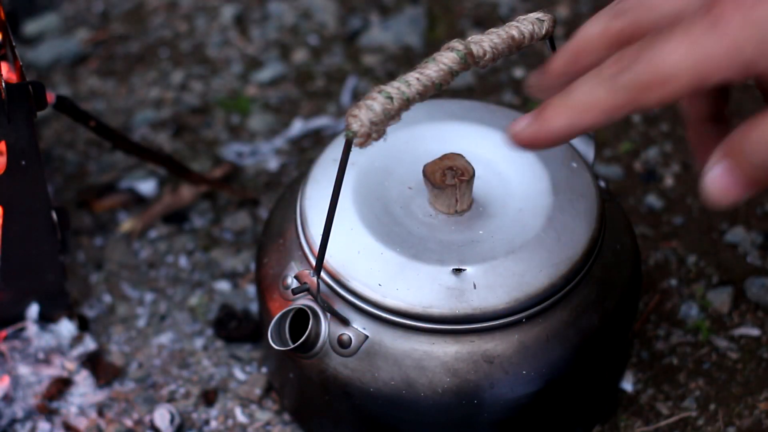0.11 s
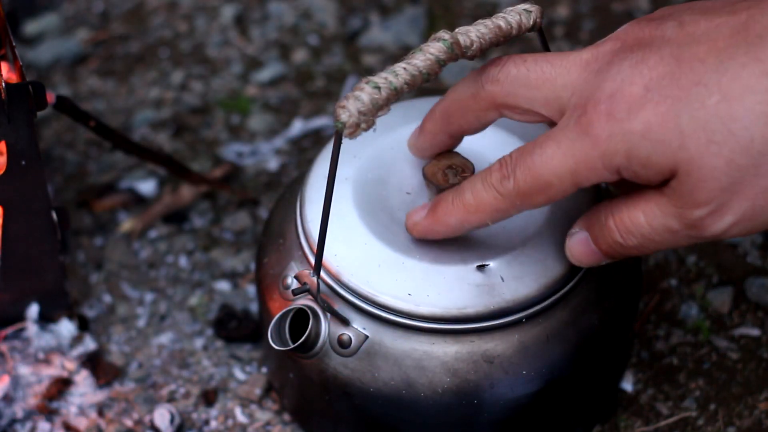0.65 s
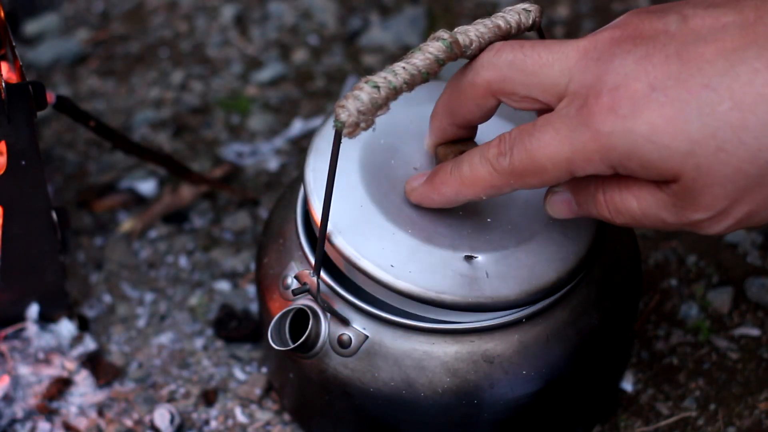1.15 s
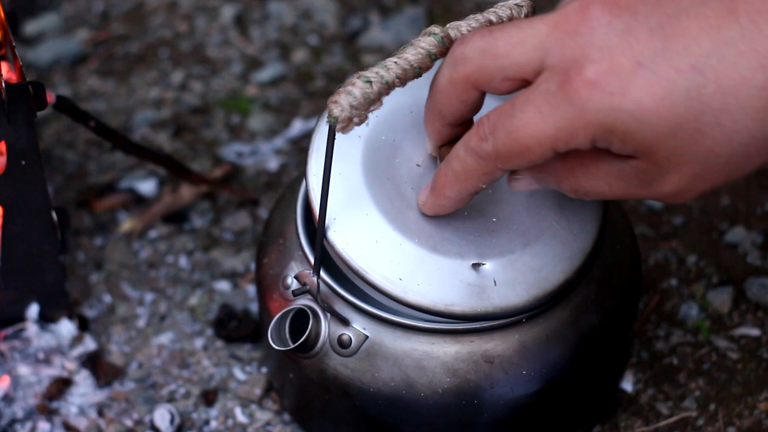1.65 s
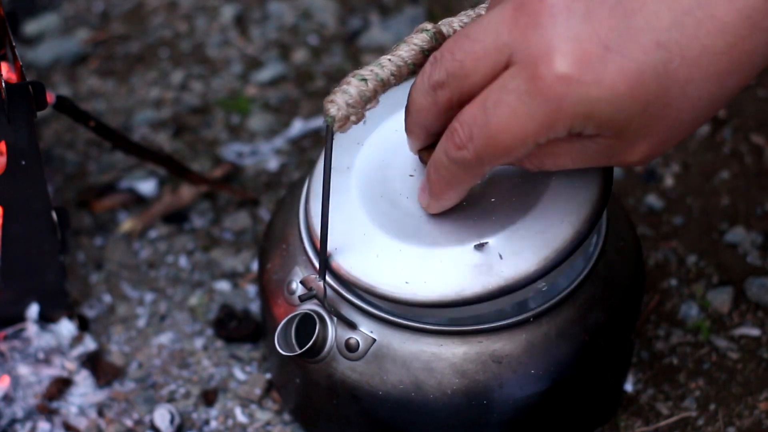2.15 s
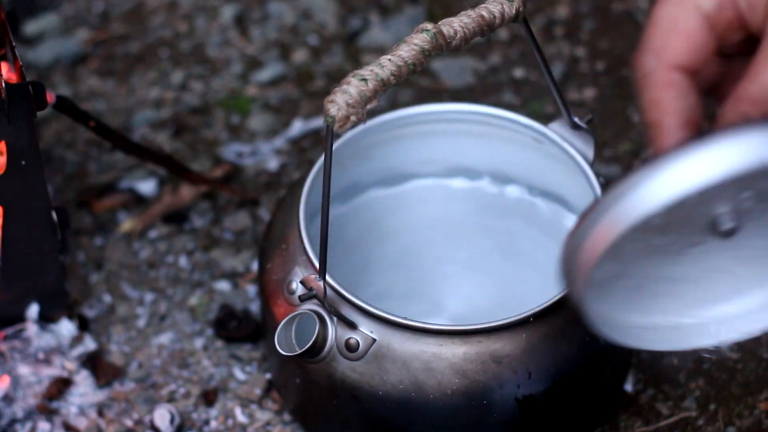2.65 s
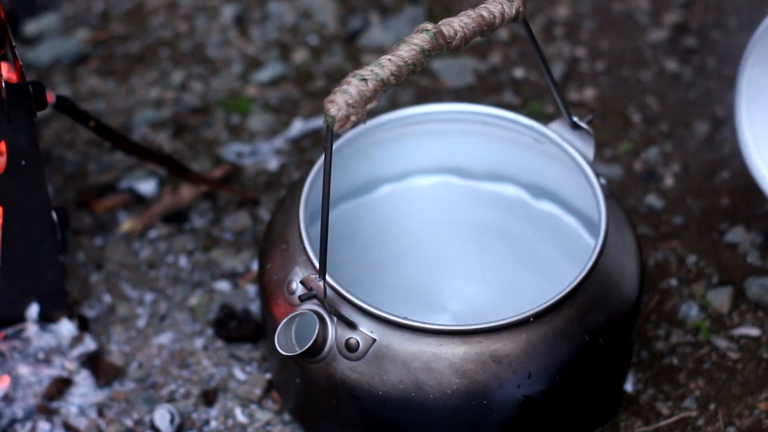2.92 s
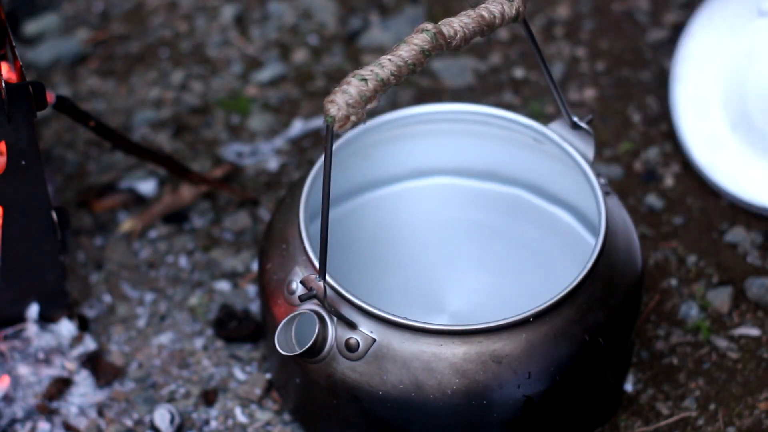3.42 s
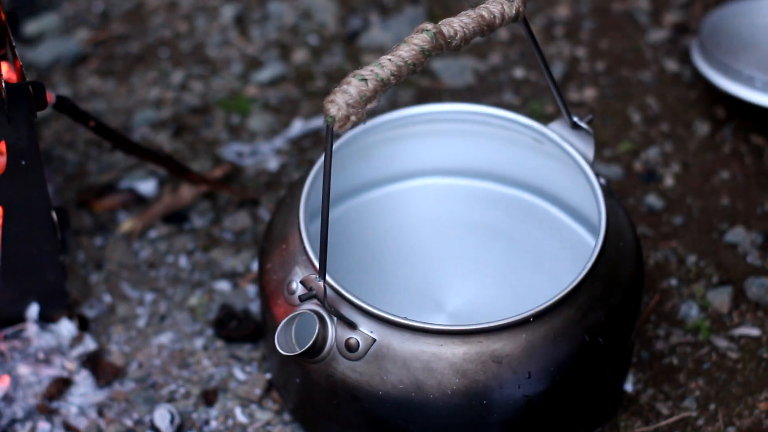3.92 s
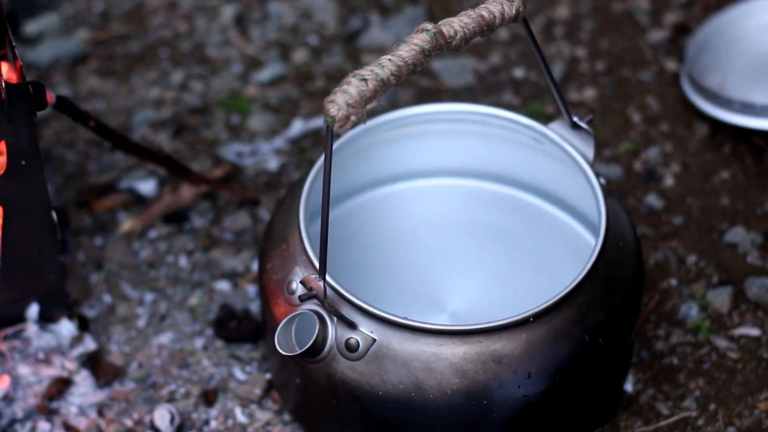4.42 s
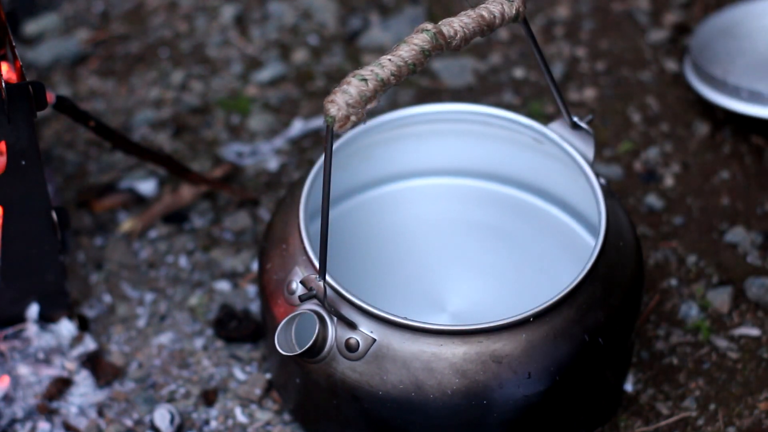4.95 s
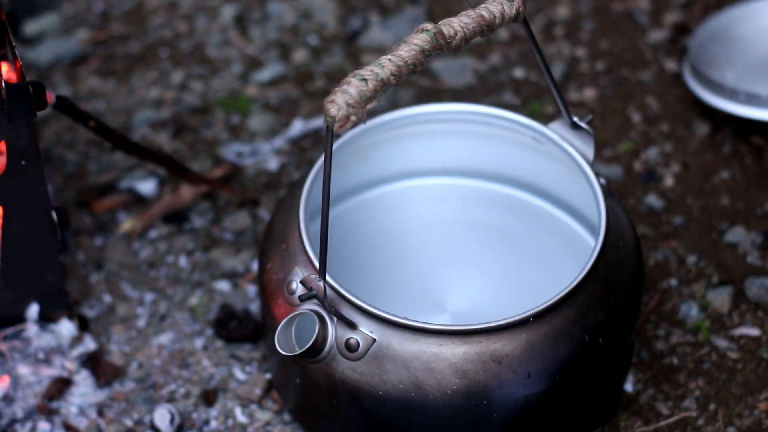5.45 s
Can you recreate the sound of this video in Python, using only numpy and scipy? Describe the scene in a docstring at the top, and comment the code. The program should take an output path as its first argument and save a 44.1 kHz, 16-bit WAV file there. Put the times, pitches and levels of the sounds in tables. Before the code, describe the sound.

Close, dry outdoor sound of a thin metal kettle lid being worked loose: sharp clinks, short scrapes and chattering knocks for about two seconds, hollow and boomy at first, thinner as it frees. After a quiet gap the lid taps and scrapes onto the ground with soft thumps. Gravel then crunches lightly, with one hard stone clack and a dense cluster of clacks at the end. Faint rumble, rustle and hiss lie underneath.

```python
"""By a campsite fire: a hand works the tight lid of a thin metal kettle loose, lifts it off and lays it on gravel.
The lid knocks and scrapes, driving the resonances of the metal and the air inside the kettle.
Embers tick, the lid's edge taps, and gravel crunches and snaps under a shifting foot: short bursts and grinding noise.
Dull thumps pass through the ground; coloured noise makes the outdoor rumble, rustle and microphone hiss."""
import sys
import numpy as np
from scipy import signal
from scipy.fft import rfft, irfft, next_fast_len
from scipy.io import wavfile
from scipy.ndimage import map_coordinates

SR = 44100
rng = np.random.default_rng(int(sys.argv[2]) if len(sys.argv) > 2 else 0)


def int16_out(signal):
    """Quantize to a 16-bit WAV file."""
    q = np.round(np.clip(np.atleast_2d(signal).T, -1, 1) * 32767)
    wavfile.write(sys.argv[1], SR, q.astype(np.int16))


def level_to_linear(level):
    """Convert decibel levels to linear amplitude factors, elementwise."""
    exponent = np.asarray(level, float) / 20
    return 10 ** exponent


N = 245637
TIME = np.arange(N) / SR


def unit(x):
    """Scaled to rms 1."""
    return x / np.sqrt(np.mean(x ** 2) + 1e-20)


def peak(x):
    """Scaled to peak 1."""
    return x / np.abs(x).max()


def curves(rows):
    """Joins timed points by straight lines: one curve for each column after the time."""
    seconds, *columns = np.transpose(rows)
    return [np.interp(TIME, seconds, column) for column in columns]


def wobble(rate):
    """A smooth random curve with rate random points a second."""
    points = rng.standard_normal(int(N * rate / SR) + 4)
    return map_coordinates(points, [TIME * rate])


def coloured(x, spectrum):
    """Filters x through (Hz, dB) points joined on a log frequency axis, then scales it to rms 1."""
    size = next_fast_len(N + 8192)
    hz, db = np.transpose(spectrum)
    bins_hz = np.fft.rfftfreq(size, 1 / SR) + 1  # 1 Hz up, as the log of 0 does not exist
    gain = level_to_linear(np.interp(np.log(bins_hz), np.log(hz), db))
    return unit(irfft(rfft(x, size) * gain, size)[..., :N])


def gritty(spread_db):
    """Noise of many tiny contacts of unequal strength."""
    return unit(rng.standard_normal(N) * level_to_linear(spread_db * wobble(rate=400)))


def high_pass(x, order, hz):
    """Takes away what lies below hz."""
    return signal.sosfilt(signal.butter(order, hz, "high", fs=SR, output="sos"), x)


def mode(x, hz, width_hz):
    """A two-pole resonance that passes white noise of rms 1 at rms 1."""
    b, a = signal.iirpeak(np.clip(hz, 20, SR / 2.2), hz / width_hz, SR)
    return signal.lfilter(b, a, x) * np.sqrt(SR / np.pi / width_hz)


def band(x, hz, width_hz):
    """Two resonances in a row, a narrow and a wide one, give steep skirts."""
    return mode(mode(x, hz, width_hz), hz, hz * 2.7)


def stroke(start, end, fade):
    """A gate that opens from start on and closes from end on, each over fade seconds."""
    rise = (TIME - start) / fade
    fall = (end - TIME) / fade + 1
    return np.clip(np.minimum(rise, fall), 0, 1) ** 2


def softened(x, top_hz, leak_db):
    """Contacts last a little while, so only a trace reaches the top octave."""
    dull = signal.sosfilt(signal.butter(4, top_hz, fs=SR, output="sos"), x)
    return dull + level_to_linear(leak_db) * (x - dull)


def outdoors():
    """A far rumble and a leafy rustle, both coloured noise of changing level."""
    # Rustle over time. Each row: time in seconds, level in dB.
    rustle_level = [(0, -55), (.45, -56.5), (2.4, -59), (2.93, -57), (3.0, -63), (4.0, -59.5), (4.6, -61),
                    (5.57, -53.5)]
    # Tone colour of the rumble. Each row: frequency in Hz, relative level in dB per Hz.
    rumble_colour = [(12, -36), (20, -5), (71, -2.5), (133, -5.5), (172, -6), (317, -11.5), (409, -12.5),
                     (1500, -20.5), (1950, -18), (3300, -120)]
    # Tone colour of the rustle. Each row: frequency in Hz, relative level in dB per Hz.
    rustle_colour = [(350, -11.5), (600, -4.5), (1060, -4.5), (1400, -4), (1900, -10), (3050, -2.5),
                     (3470, -7), (5490, -2.5), (10000, -15), (13000, -53), (22000, -120)]
    (rustle_db,) = curves(rustle_level)
    rumble = level_to_linear(-58 + wobble(rate=8.2)) * coloured(rng.standard_normal(N), rumble_colour)
    rustle = level_to_linear(rustle_db + 0.86 * wobble(rate=59)) * coloured(gritty(spread_db=1.5), rustle_colour)
    return rumble + rustle


def thumps():
    """Soft low pushes through the ground: sines that swell for a moment and die away."""
    # Dull thumps. Each row: start in seconds, relative level in dB, pitch in Hz,
    # time in seconds over which the damping takes 60 dB.
    thump_rows = [(.97, -45, 92, 0.1), (1.33, -52, 90, 0.11), (2.1, -52.5, 89, 0.14),
                  (2.199, -53.5, 80, 0.17), (3.33, -44.5, 162, 0.098), (3.345, -52, 80, 0.14),
                  (3.71, -50, 85, .12), (3.702, -40, 151, 0.066)]
    out = np.zeros(N)
    for start, db, hz, t60 in thump_rows:
        after = np.clip(TIME - start, 0, None)
        swell = 150 * after
        out += level_to_linear(db - 60 * after / t60) * swell * np.sin(2 * np.pi * hz * after)
    return out


def stony(x, hz, broad_db):
    """A broad crack around hz and the stone resonances near it."""
    # Resonances of the stones. Each row: frequency in Hz,
    # width in Hz of the narrower of two filters, relative level in dB.
    stone_modes = [(910, 370, -11), (1547, 500, 1.5), (2950, 650, -0.2), (4120, 500, .5001),
                   (5270, 2200, -1), (7960, 2200, -4)]
    reach_octaves = 0.51  # stones further from hz than about this ring less
    out = level_to_linear(broad_db) * band(x, hz, 2.2 * hz)
    for stone_hz, width_hz, db in stone_modes:
        near = np.exp(-(np.log2(stone_hz / hz) / reach_octaves) ** 2 / 2)
        out = out + level_to_linear(db) * near * mode(mode(x, stone_hz, width_hz), stone_hz, 3 * width_hz)
    return out


def rattle():
    """A short rattle of gravel at steady level: gritty noise through the stone resonances."""
    # The rattle, a single row: start in seconds, start of its fade-out in seconds, relative level in dB,
    # centre in Hz, level of the broad noise against the ring in dB.
    rattle_rows = [(4.992, 5.05, -42, 2400, -8)]
    (start, end, db, hz, broad_db), = rattle_rows
    return level_to_linear(db) * stroke(start, end, fade=0.003) * unit(stony(gritty(spread_db=2.0), hz, broad_db))


def crunches():
    """Stones grind in clumps of grains under weight, each press with its own colour."""
    # Presses on the gravel. Each row: start in seconds, start of the fade-out in seconds,
    # relative level at the start in dB, relative level at the end in dB, centre in Hz.
    presses = [(3.884, 4.19, -63, -58.5, 4480), (4.186, 4.217, -54, -45, 4500),
               (4.238, 4.328, -41.5, -58, 5100), (4.373, 4.41, -52, -58, 4000),
               (4.462, 4.474, -60, -44.5, 4730), (4.991, 5.036, -41, -55, 5500),
               (5.104, 5.165, -45.5, -48, 4300), (5.199, 5.279, -53.5, -47.5, 3000),
               (5.288, 5.39, -54.5, -43.5, 2420), (5.384, 5.494, -38.5, -36, 3140),
               (5.523, 5.572, -36.5, -47, 2830)]
    soil_db, soil_hz = -9, 700  # the soil gives a dull rumble under the grinding
    out = np.zeros(N)
    for start, end, start_db, end_db, hz in presses:
        grind = gritty(spread_db=2.5) * level_to_linear(1.2 * wobble(rate=64))
        level = level_to_linear(np.interp(TIME, [start, end], [start_db, end_db])) * stroke(start, end, fade=0.0043)
        stones = unit(stony(grind, hz, broad_db=19))
        soil = unit(band(grind, soil_hz, soil_hz))
        out += level * (stones + level_to_linear(soil_db) * soil)
    return out


def gravel():
    """Grinding stones and a short rattle, with the top octave softened."""
    return softened(rattle() + crunches(), top_hz=9000, leak_db=-14.0)


def burst(hz):
    """A sharp push and noise that dies the faster the higher it sounds."""
    t = TIME[:SR // 8]
    t60 = 0.056 * (hz / 1000) ** -0.61  # seconds; 0.056 at 1 kHz
    push = 6 * np.exp(-t * 9000)
    return (rng.standard_normal(len(t)) + push) * level_to_linear(-60 * t / t60)


def ticks():
    """Dry ticks of embers and grit: bursts in one narrow band."""
    # Ticks. Each row: start in seconds, relative level in dB, centre in Hz.
    tick_rows = [(.065, -30.5, 3370), (.265, -36, 2850), (1.323, -29, 7000), (2.054, -29, 7000),
                 (2.525, -27, 5800), (3.083, -37, 2360), (3.825, -34, 6700), (3.987, -28.5, 6400),
                 (4.818, -43, 7210), (5.482, -36, 8500)]
    return [(start, db, peak(band(burst(hz), hz, 0.29 * hz))) for start, db, hz in tick_rows]


def taps():
    """Hollow taps of the lid's edge: a pitch, one overtone and a click."""
    # Taps. Each row: start in seconds, relative level in dB, pitch in Hz,
    # level of the click against the pitch in dB.
    tap_rows = [(.774, -30, 1060, 9.5), (3.566, -40, 1330, -12), (3.68, -25.5, 1436, 6.5),
                (3.704, -46, 1400, 12)]
    click_hz = 2840
    sounds = []
    for start, db, hz, click_db in tap_rows:
        push = burst(hz)
        click = peak(band(burst(click_hz), click_hz, 0.32 * click_hz))
        low = peak(band(push, hz, 0.071 * hz))
        overtone = peak(band(push, 1.58 * hz, 0.071 * hz))
        tap = low + level_to_linear(-8) * overtone + level_to_linear(click_db) * click
        sounds.append((start, db, high_pass(tap, 4, 0.85 * hz)))
    return sounds


def clacks():
    """Stones clack under a foot: a stony burst with a short thud under it."""
    # Clacks. Each row: start in seconds, relative level in dB, centre in Hz,
    # level of the thud in dB, level of the broad crack in dB.
    clack_rows = [(4.201, -35.5, 4670, -16, 3), (4.226, -12.5, 3600, -13, 19), (4.984, -1, 4030, -20.5, 1),
                  (5.146, -28.5, 2220, -5.5, 0), (5.298, -36.5, 1890, -1.5, 3), (5.32, -39, 3500, -4, -3),
                  (5.344, -14.5, 2720, -22, -17), (5.38, -33, 3130, 2, -3), (5.419, -14.5, 4960, -10, 5),
                  (5.454, -17, 3100, -23, -9), (5.458, -15.5, 2400, -16.5, -6),
                  (5.503, -6.5, 2130, -22, -11), (5.506, -4, 4200, -15.5, 1), (5.522, -16, 3070, -16, -12),
                  (5.561, -13, 3200, -24, -9)]
    sounds = []
    for start, db, hz, thud_db, broad_db in clack_rows:
        push = burst(hz)
        thud = peak(mode(push, 422, 154) + mode(push, 876, 155))
        sounds.append((start, db, peak(stony(push, hz, broad_db)) + level_to_linear(thud_db) * thud))
    return sounds


def snaps():
    """Sets the dying bursts of ticks, taps and clacks at their times and softens the top octave."""
    out = np.zeros(N + SR)
    for start, db, sound in ticks() + taps() + clacks():
        out[round(start * SR):][:len(sound)] += level_to_linear(db) * sound
    return softened(out[:N], top_hz=9300, leak_db=-18.5)


def shares(db, wall_db, low_db):
    """Gains of the push on the low, wall, dome and rim modes; the dome's rises with the wall's."""
    dome_db = -2 + 0.51 * wall_db
    return level_to_linear(db + np.array([[low_db], [wall_db], [dome_db], [0]]))


def lid_force(place):
    """Slides rasp and knocks chatter briefly: four rows of push, for the low, wall, dome and rim modes."""
    # Lid sliding, on the kettle and later on the ground. Each row: start in seconds,
    # start of the fade-out in seconds, relative rim level, wall share and low share in dB.
    slides = [(0.535, 0.632, -39, -18.5, -27), (0.657, 0.697, -58, -3, -3), (0.825, 0.935, -64.5, 1.5, -1),
              (0.955, 0.986, -56, -7, 0.4), (0.985, 1.097, -42, -10, -12.5), (1.112, 1.178, -53, 0.5, -6),
              (1.205, 1.264, -60, 3.5, -2.5), (1.268, 1.335, -55.5, 0, -6), (1.397, 1.44, -47, -9.5, -26),
              (1.453, 1.489, -41, 4, -8), (1.499, 1.541, -50, -3, -27), (1.553, 1.6, -52.5, -6, -16),
              (1.679, 1.723, -42.5, -16.5, -27), (1.727, 1.761, -60, 1, -4), (1.858, 1.882, -49.5, -1, -18),
              (1.896, 1.968, -53.5, -2, -10), (1.973, 2.01, -39, -6.5, -20),
              (2.05, 2.105, -47.5, -6, -15.5), (2.118, 2.181, -42, -8.5, -19),
              (2.314, 2.398, -50.5, -4.5, -15), (3.467, 3.525, -48, -28, -34), (3.54, 3.589, -47, -13, -23),
              (3.595, 3.693, -62, -6, -9)]
    # Metal contacts. Each row: start in seconds, relative rim level, wall share and low share in dB.
    knocks = [(0.5216, -22, -6.5, -10.5), (0.5307, -21, -11, -14), (0.6605, -32.5, -12, -10.5),
              (0.8083, -17.5, -9.5, -11), (0.851, -17, -15, -13), (0.936, -12.5, -8, -13),
              (1.274, -20.5, -2.5, -12.5), (1.3618, -39.5, 10.5, -1.5), (1.429, -33, -26, -17),
              (1.4456, -18, 0, -3), (1.479, -32, -15, -8), (1.489, -35, -14, -30), (1.6434, -36, -2, -24),
              (1.715, -19.5, -3.5, -4.5), (1.7924, -40.5, 1, -4.5), (1.8223, -49.5, 11, 7),
              (1.8707, -25, -8, -24), (1.916, -37, 4, -9), (1.928, -34.5, 7, 3), (2.0151, -38.5, 5.5, -8),
              (2.169, -39, 2.5, -33), (2.396, -35.5, -6, -24), (3.3185, -25.5, -10.5, -23),
              (3.5325, -27.5, -23, -25), (3.5747, -32.5, -20, -30)]
    # Seconds in which a knock's chatter falls by 60 dB, with the lid seated, free and on the ground.
    chatter_s = [0.069, 0.048, .03]
    force = sum(shares(*levels) * stroke(start, end, fade=0.011) for start, end, *levels in slides)
    force = force * level_to_linear(3.34 * wobble(rate=51))
    blows, t = np.zeros((4, N)), TIME[:SR // 3]
    for start, *levels in knocks:
        first = round(start * SR)
        strength = shares(*levels)
        t60 = np.interp(place[first], range(3), chatter_s)
        force[:, first:][:, :len(t)] += strength * level_to_linear(-6 - 60 * t / t60)
        blows[:, first] += strength[:, 0] * level_to_linear(9.0)  # the first touch is one clean push
    return force * gritty(spread_db=2.5) + blows


def metal_ring(force, place):
    """Resonances of lid and kettle; what the lid rests on damps some and frees others."""
    # Crowds of weak modes, low to high. Each row: frequency in Hz, width in Hz of the narrower
    # of two filters, relative level in dB with the lid seated, free and on the ground.
    crowds = [(1080, 910, -8.5, -7.5, -30), (2800, 1200, -7, -15.5, -16), (4380, 2200, -5, -6.5, -21),
              (7000, 1300, -25, -22, -18)]
    # Single modes of lid and kettle. Each row: frequency in Hz, width in Hz,
    # relative level in dB with the lid seated, free and on the ground.
    single_modes = [(634, 31, 3.5, -23, -40), (825, 64, -5, -28, -35), (1026, 220, -13, -25, -30),
                    (1200, 170, -19, -15.5, -33), (1320, 88, -9, -8, -16), (1420, 33, -23, -17, 7.5),
                    (1683, 290, -3, -10, -2), (2125, 80, -2.5, -19, -14), (2208, 61, -6.5, 2, 0),
                    (2440, 52, -7, -13, -5), (2804, 40, -4.5, -10, -7), (3140, 80, -9.5, -10, -15),
                    (3330, 25, -6.5, -6.5, -2), (3544, 110, -2, -9.5, -2.5), (3940, 25, -15, -8, -15),
                    (4210, 14, -27, -8, -2), (4405, 56, -6, -8, -22), (4738, 46, 4, 0, -20),
                    (5040, 60, -19, -10, -23), (5810, 42, -7, -3.5, -10), (5940, 137, -12, -9, -6.5),
                    (6166, 81, -0.5, -5, 3.5), (6600, 29, -16, -7, -6), (6770, 65, -22, -10, -9),
                    (7100, 35, -19, -17, -23), (7390, 110, -14, -13, -9), (7750, 120, -24, -19, -16),
                    (8270, 39, -13, -9, -11), (8370, 38, -8, -11, -18), (8510, 110, -11.5, -21, -20),
                    (9800, 90, -30, -10, -24), (10730, 130, -28, -19.5, -9)]
    ring = np.zeros(N)
    for push, (hz, width_hz, *db) in zip(force, crowds):
        level = level_to_linear(np.interp(place, range(3), db))
        ring += level * mode(mode(push, hz, width_hz), hz, 2 * width_hz)
    for hz, width_hz, *db in single_modes:
        part = np.searchsorted([1750, 3900, 5300], hz)  # low, wall, dome or rim
        # the contact point wanders, so each mode gets its own changing share
        share_db = np.interp(place, range(3), db) - 3 + 1.64 * wobble(rate=14)
        ring += mode(force[part] * level_to_linear(share_db) * np.sqrt(width_hz / 60), hz, width_hz)
    return high_pass(ring, 3, 620)  # thin sheet radiates no bass


def hollow(push):
    """The air under the lid and the kettle bottom boom while the lid is nearly shut."""
    # Air inside the kettle, rising as the lid gap opens.
    # Each row: time in seconds, pitch in Hz, relative level in dB.
    cavity = [(.5, 400, 10), (.95, 370, 6), (1.05, 432, 7), (1.15, 507, 8), (1.27, 790, 13),
              (1.33, 850, -42)]
    air_hz, air_db = curves(cavity)
    # a moving resonance: shift down, smooth, shift back
    turn = np.exp(2j * np.pi * np.cumsum(air_hz) / SR)
    air = signal.lfilter([1], [1, -np.exp(-np.pi * 80 / SR)], push * level_to_linear(air_db - 20.5) / turn)
    bottom = mode(push * level_to_linear(air_db - 13.5) * (TIME < 1), 307, 23)  # pushed only in the first second
    return mode((air * turn).real, 530, 1000) / 5 + bottom


def metal():
    """Knocks and slides of the lid drive the metal, a high shimmer and the air in the kettle."""
    # Where the lid rests. Each row: time in seconds, place (0 seated, 1 free, 2 on the ground).
    lid_places = [(1.04, 0), (1.14, 1), (2.6, 1), (3.0, 2)]
    (place,) = curves(lid_places)
    force = lid_force(place)
    ring = softened(metal_ring(force, place), top_hz=8980, leak_db=-14.0)
    shimmer = level_to_linear(-37.0) * mode(mode(force[3], 13000, 2000), 13700, 3000)
    return ring + shimmer + hollow(force[0])


def scene():
    """Everything stands in front of the microphone, alike in both channels."""
    return np.tile(outdoors() + thumps() + gravel() + snaps() + metal(), (2, 1))


def band_limit(x):
    """A steep low-pass at the top of the band."""
    return signal.sosfilt(signal.butter(12, 16800, fs=SR, output="sos"), x)


def record(dry):
    """Each channel adds its own microphone hiss."""
    # Tone colour of the hiss. Each row: frequency in Hz, relative level in dB per Hz.
    hiss_colour = [(18, -28.5), (30, 7), (80, -5), (128, -3.5), (340, -4.5), (378, -6.5), (13700, -7),
                   (15200, -6), (16500, -27)]
    hiss = level_to_linear(-56) * coloured(rng.standard_normal((2, N)), hiss_colour)
    return band_limit(dry + hiss)


dry = scene()
out = record(dry)
int16_out(out)
```